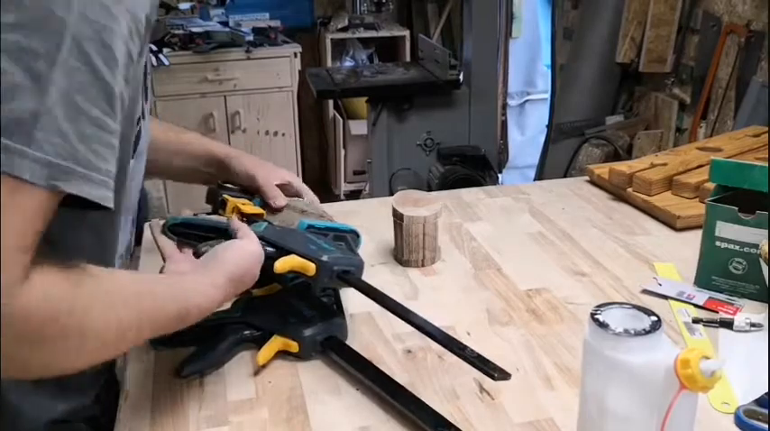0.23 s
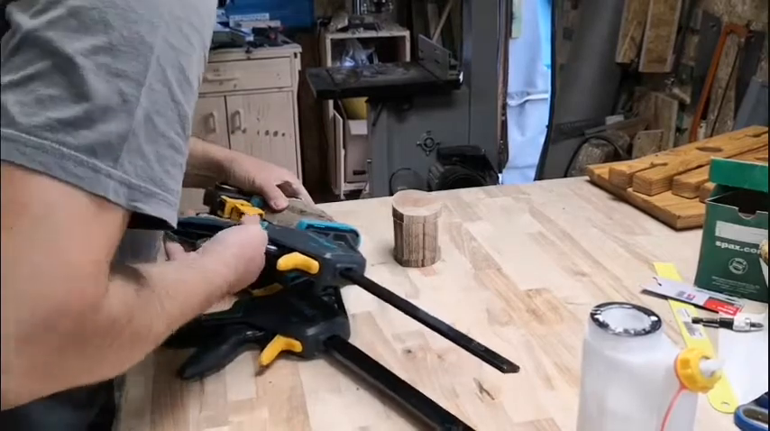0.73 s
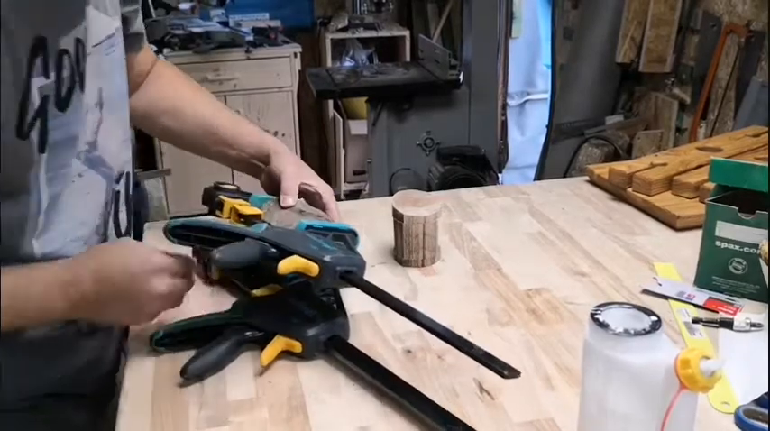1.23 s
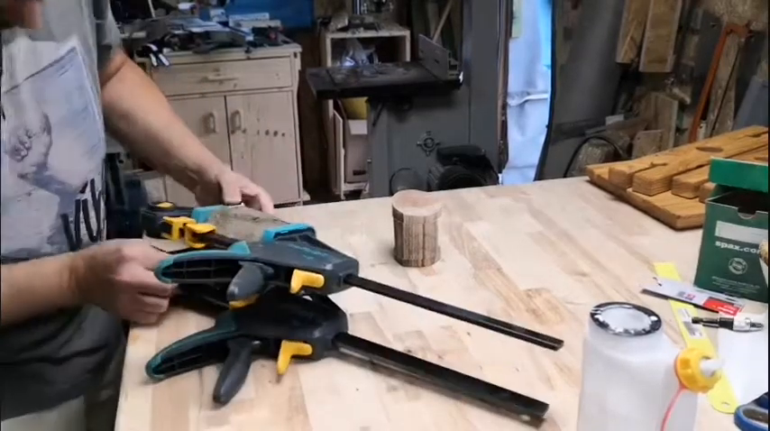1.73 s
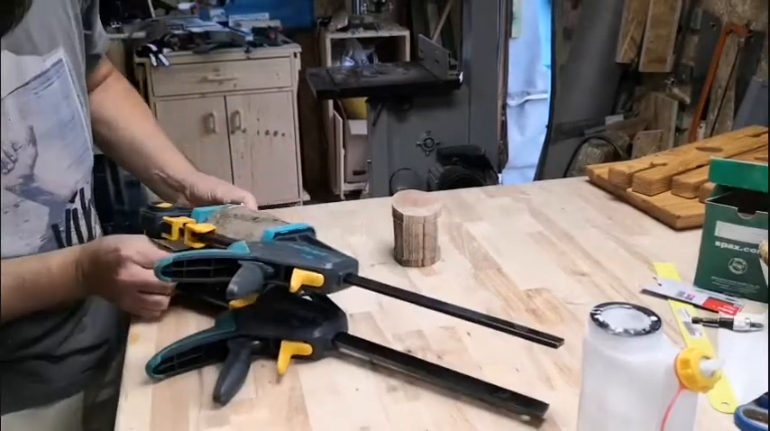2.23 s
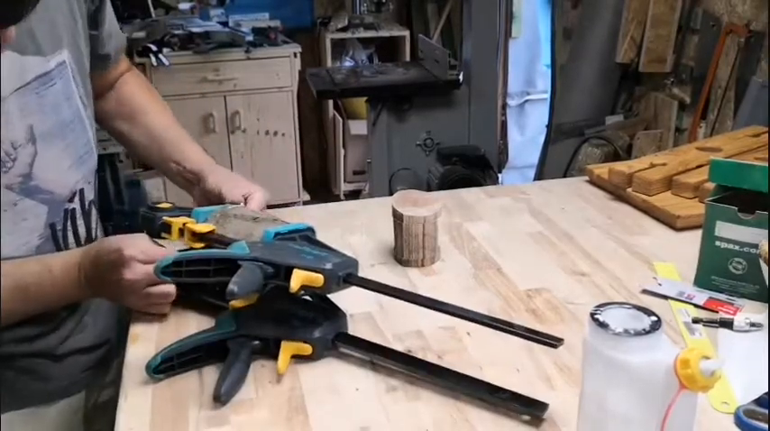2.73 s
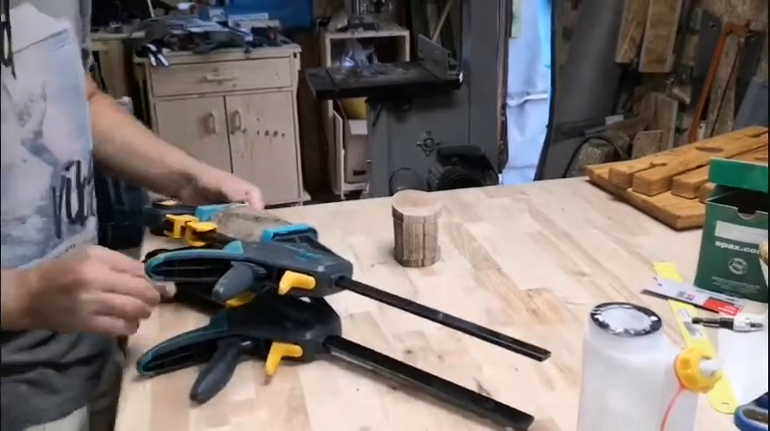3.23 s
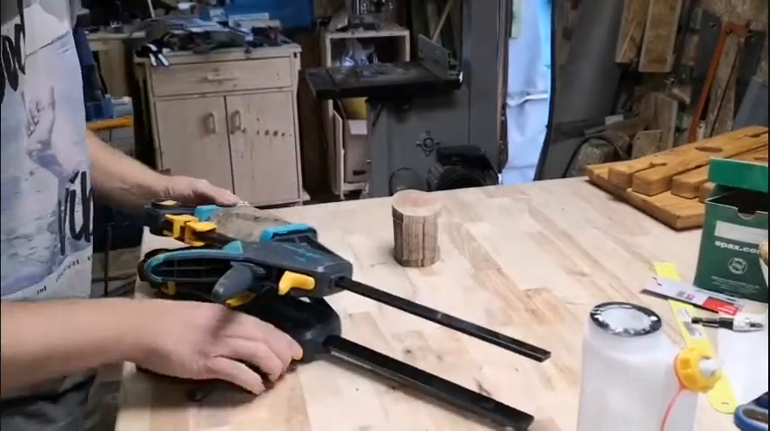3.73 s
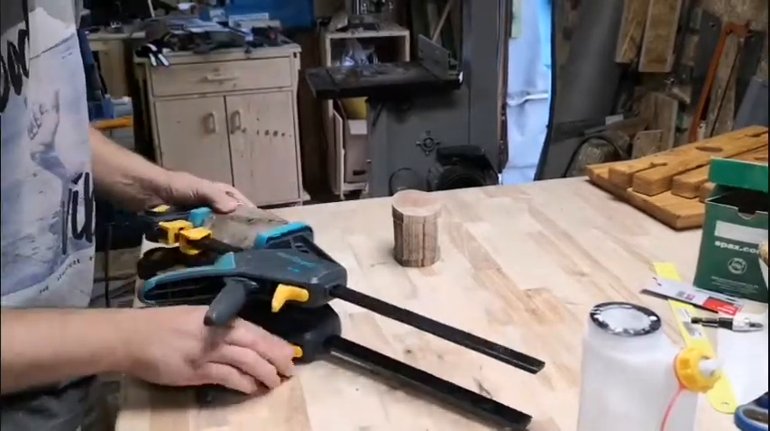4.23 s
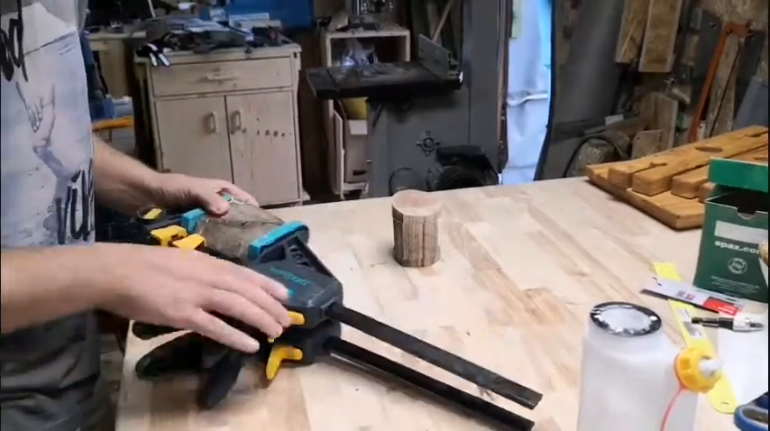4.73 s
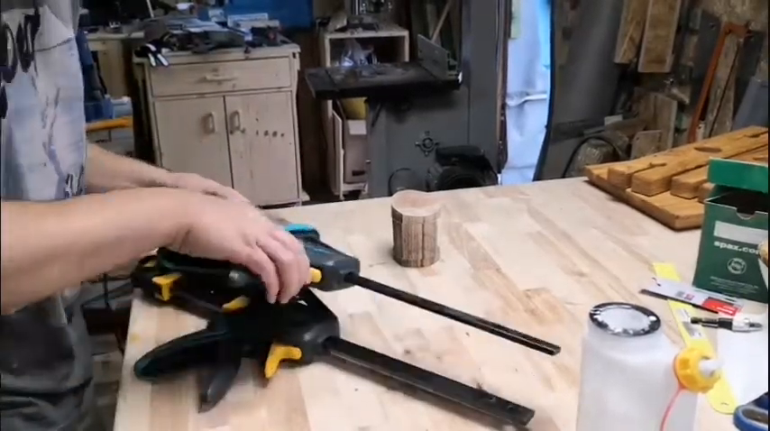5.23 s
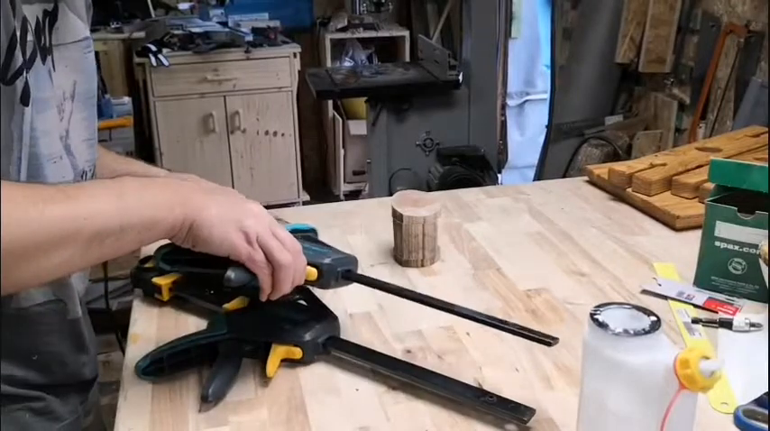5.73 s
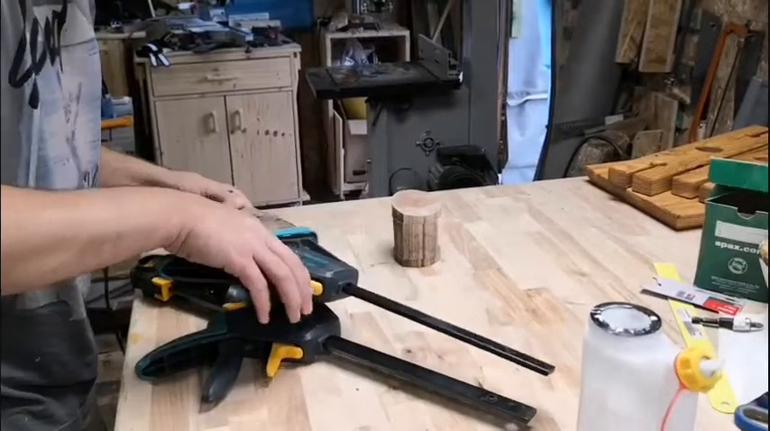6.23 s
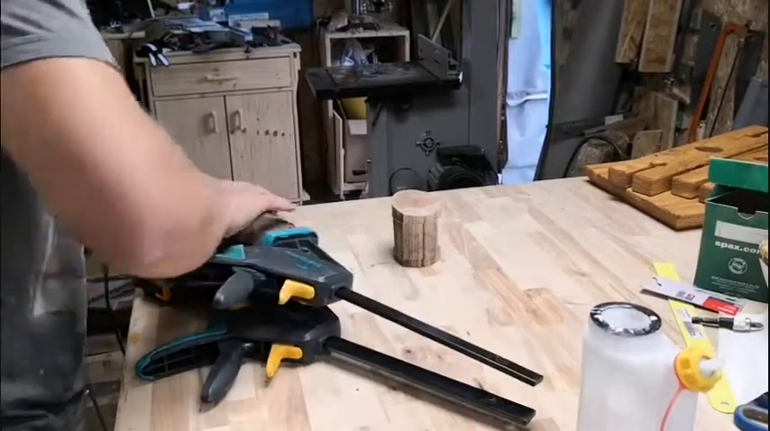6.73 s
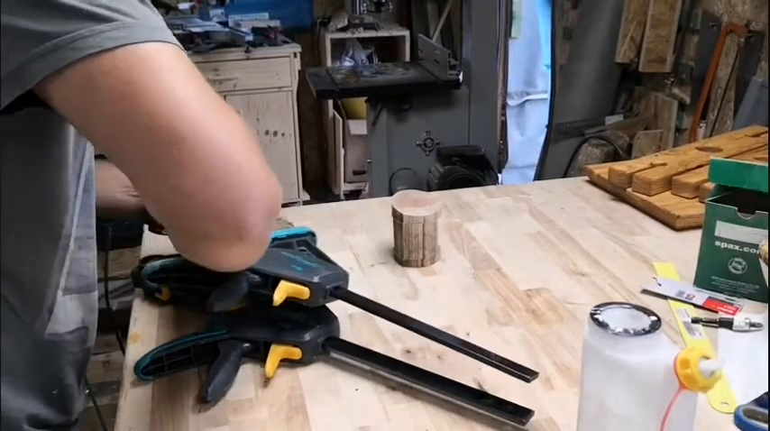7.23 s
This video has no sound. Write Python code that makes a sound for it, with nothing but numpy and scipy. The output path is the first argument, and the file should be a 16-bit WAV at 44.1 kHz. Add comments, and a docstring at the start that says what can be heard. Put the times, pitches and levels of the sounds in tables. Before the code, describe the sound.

In a small cluttered workshop, plastic and steel clamps are handled on a thick wooden bench. A cluster of clicks comes first, then scuffs and dull thumps, a flurry of knocks around three seconds, and a loud ringing snap just after four. Softer knocks, chirping squeaks and clicks follow. Close stereo microphone, short dense reflections, faint rumble and hiss.

```python
"""Plastic quick-release bar clamps click, squeak and snap as they are handled on a wooden workbench.
Clicks are shaped noise bursts that ring the handle and steel bar; squeaks are harmonic chirps, and a
trigger spring twangs in wavering partials. Knocks and pushes sound the boards and set the heavy bench
top booming, with decaying modes; slides over the wood are grainy, filtered noise.
The cluttered workshop answers with short, dense reflections, over a faint rumble and hiss."""
import sys
import numpy as np
from scipy import signal
from scipy.fft import rfft, irfft, next_fast_len
from scipy.io import wavfile
from scipy.ndimage import uniform_filter1d

SR = 44100
rng = np.random.default_rng(int(sys.argv[2]) if len(sys.argv) > 2 else 0)


def waveform_to_disk(signal):
    """Save audio, clipped to [-1, 1], as 16-bit WAV at the path in sys.argv[1]."""
    frames = np.transpose(np.atleast_2d(signal))
    scaled = np.clip(frames, -1, 1) * 32767
    samples = np.round(scaled).astype(np.int16)
    wavfile.write(sys.argv[1], SR, samples)


N = 329338

# Plastic parts click: (time [s], body [dB], middle [dB], treble [dB])
CLICK_EVENTS = [(0.002, -51, -54, -57), (0.198, -78, -60, -72), (0.611, -43, -49.5, -49),
                (0.649, -37, -45, -42.5), (0.7331, -33, -40, -34.5), (0.876, -43.5, -45.5, -43),
                (2.121, -83, -68, -75), (3.157, -51, -50, -58.5), (3.831, -67, -56.5, -72),
                (3.849, -62, -54.5, -65), (4.0953, -67, -42.5, -55.5), (4.115, -40, -27.5, -33),
                (4.1256, -34.5, -26, -40), (4.1354, -35.5, -27, -25.5), (4.4, -75.5, -68.5, -73),
                (5.008, -54, -63, -61), (5.243, -51.5, -50, -72), (5.3075, -52, -50.5, -55.5),
                (5.462, -56, -45.5, -43), (5.583, -57, -49.5, -49.5), (6.1006, -51, -49, -57),
                (6.157, -48.5, -46.5, -56.5), (6.17, -45.5, -49.5, -54.5), (7.153, -61, -64, -73)]
# Spectrum of hard plastic: (frequency [Hz], relative level [dB])
PLASTIC_COLOUR = [(120, -8), (250, 8), (370, -2.5), (530, 1), (750, -4), (1100, -9), (1800, 0.5), (2900, 1),
                  (4000, 2), (5800, -1.5), (7300, 1.5), (16000, 0)]
# Modes of the clamp with its steel bar: (frequency [Hz], relative level [dB], t60 [s])
BAR_MODES = [(567, -14, 0.24), (831, -12.5, 0.16), (1213, -17, 0.26), (1289, -14, .2), (1750, -11, .18),
             (1834, -7.5, 0.17), (1915, -4.5, 0.23), (1960, 6.5, 0.1), (2020, -1.5, .16), (2100, -5, 0.14),
             (2590, -13.5, 0.26), (3520, -17, .2), (4560, -8, 0.097), (6660, -11, 0.17), (7150, -5, .12),
             (7090, -8.5, 0.065)]
# Modes of the hollow handle: (frequency [Hz], relative level [dB], t60 [s])
HANDLE_MODES = [(262.3, -2.5, 0.12), (389.3, -9.5, 0.057), (508, -2.5, 0.078), (568.5, 2.5, 0.072),
                (686, -13.5, 0.13)]
# A trigger spring is jogged and twangs: (time [s], gain [dB])
TWANG_EVENTS = [(4.911, -62.5), (4.935, -65.5), (5.002, -61)]
# Partials of the coil spring inside a trigger: (frequency [Hz], relative level [dB], t60 [s])
SPRING_MODES = [(1559, 1.5, 0.15), (2080, 5, 0.14), (2380, -2.5, 0.13), (3120, -9, 0.24), (3960, -10, 0.2),
                (4960, -6, 0.19), (6180, -6.5, .17), (7500, -1, 0.14), (7460, -9.5, 0.12), (7430, -2, 0.15)]
# A tight grip sticks and slips: (time [s], length [s], pitch [Hz], glide [share of pitch], level [dB])
SQUEAK_EVENTS = [(5.459, 0.014, 915, 0.037, -40.5), (5.949, 0.024, 869, 0.048, -50.5),
                 (5.978, 0.031, 870, 0.036, -64), (6.003, 0.022, 984, 0.095, -46.5)]
# Strength of the squeak's harmonics: (frequency [Hz], relative level [dB])
SQUEAK_TONE = [(850, 2), (2000, 5.5), (2900, -2.5), (3900, -15), (5200, -16.5), (7000, -8.5), (8000, -13),
               (12000, -22)]
# Clamps land on, or push and jolt, the wooden bench:
# (time [s], thud [dB], hardness over the thud [dB], push on the bench [dB],
# pitch of the sway [Hz], loss of the bench's sway per rocking back [dB])
KNOCK_EVENTS = [(0.0, -55.5, -10.5, -32, 61.7, 13), (0.074, -58, -32, -30.5, 65, 7),
                (0.942, -36, -13.5, -29, 48.1, 16.5), (1.02, -57, -22, -28, 62.3, 25),
                (1.594, -37, -3, -22, 69.6, 3.5), (1.674, -49, -18, -27, 66.7, 9),
                (2.633, -48.5, -18.5, -32, 62.4, 5), (2.935, -37.5, -14.5, -25.5, 61.2, 6),
                (3.08, -32, -9, -23, 72.9, 9.5), (3.138, -45.5, -7, -28, 66.5, 17.5),
                (3.1904, -31.5, -10.5, -23, 68.9, 15), (3.231, -41.5, -20, -23, 62.8, 11),
                (4.137, -41.5, -6.5, -15, 57.7, 8.5), (3.64, -70, -5.5, -45, 78.1, 7.5),
                (4.827, -76, -24, -43, 60.5, 20), (5.01, -40.5, -14, -27, 78.4, 9),
                (5.065, -46, -10, -42.5, 70.8, 14), (5.143, -50.5, -17.5, -29.5, 63, 14),
                (5.244, -40, -21.5, -23, 71.5, 20), (5.259, -38.5, -19, -30.5, 69, 14),
                (5.286, -39, -11, -25, 72.66, 14), (5.597, -55.5, -12, -38, 61.76, 10),
                (6.179, -44.5, -8, -26, 61.8, 17), (6.226, -41.5, -15.5, -23.5, 59.4, 6),
                (6.789, -74, -11.5, -40.5, 46.7, 9), (7.105, -57, -24, -49, 78.3, 3.5)]
# Spectrum of a blow on thick wood: (frequency [Hz], relative level [dB])
WOOD_COLOUR = [(90, -12), (170, -3), (250, 2.5), (340, -8), (520, -14), (800, -20), (1700, -24.5),
               (3000, -36.5), (8000, -50)]
# The boards of the bench top: (frequency [Hz], relative level [dB], t60 [s])
BOARD_MODES = [(223, -1, 0.21), (247, -3, .16), (282.7, -2, 0.42), (352.7, -5.5, 0.19), (530, -13.5, 0.17),
               (865, -21.5, .14)]
# The whole bench booming: (frequency [Hz], relative level [dB], t60 [s])
BENCH_MODES = [(53.1, -8.5, .55), (75.07, -7, 0.39), (98.3, -16, 0.49), (134.5, -23.5, 0.34),
               (158, -38, 0.21), (217.6, -37.5, 0.14), (282.8, -36, 0.22)]
# Clamps and hands slide over the wood:
# (start [s], speeding up [s], slowing down [s], relative drag [dB], rasp [dB] and hiss [dB])
SLIDE_EVENTS = [(0.42, 0.08, 0.1, -78, -69, -70), (0.89, 0.05, 0.22, -66, -56.5, -72.5),
                (1.068, 0.1, 0.098, -74, -45, -48.5), (1.24, 0.011, 0.055, -76, -63, -53.5),
                (1.35, 0.086, 0.28, -62, -65, -71), (1.48, 0.12, 0.063, -59, -63.5, -65.5),
                (2.89, 0.047, 0.095, -68, -66, -66.5), (3.079, 0.096, 0.2, -73, -54.5, -58.5),
                (3.293, 0.037, 0.038, -76, -48.5, -45.5), (3.61, .035, 0.022, -71, -69, -65),
                (3.819, 0.028, 0.1, -57.5, -54, -65), (6.15, 0.043, .15, -65, -58, -67.5),
                (6.66, 0.11, 0.052, -84, -74, -66)]
# Spectrum of the friction noise: (frequency [Hz], relative density [dB per Hz])
FRICTION_COLOUR = [(150, -12.5), (300, -8), (550, -15.5), (850, -17), (1250, -7.5), (1600, -6.5),
                   (2000, -6.5), (2450, -4), (3050, -10.5), (6000, -10.5), (7400, -8), (8700, -29.5),
                   (15000, -25)]
# Bands of drag, rasp and hiss: (low edge [Hz], high edge [Hz])
FRICTION_BANDS = [(200, 800), (900, 2800), (2800, 16000)]
# The clamp's bar sings along as it scrapes: (frequency [Hz], width [Hz], level against the rasp [dB])
SCRAPE_MODE = (1900, 350, 1.0)
# A long bar still ringing at the start: (frequency [Hz], level [dB], t60 [s])
BAR_HUM_MODE = (436, -58.5, 1.03)
# Decay of the cluttered room: (frequency [Hz], t60 [s])
ROOM_DECAY = [(60, 0.54), (250, 0.16), (500, 0.19), (2000, 0.23), (7000, 0.22), (15000, 0.084)]
# Left-right likeness of diffuse sound: (frequency [Hz], correlation [-1 to 1])
STEREO_LIKENESS = [(100, 0.97), (260, 0.25), (400, 0.057), (1200, 0.22), (2000, 0.028), (6000, 0.058),
                   (9000, 1), (15000, 1)]
# Phase by which the left channel leads: (frequency [Hz], phase [rad])
STEREO_PHASE = [(60, 0.44), (170, 0.18), (330, 1.0), (650, 1.53), (1300, -0.06), (2500, 4), (4000, 1.5),
                (6000, 1.6), (7300, 0.57), (15000, -6.5)]
# Left level over right level: (frequency [Hz], difference [dB])
STEREO_BALANCE = [(250, 0), (600, 1), (1100, 1), (4500, 0), (8000, 0), (13000, -1.5)]
# Dull treble of clicks, knocks, twangs and squeaks: (frequency [Hz], gain [dB])
HIT_DULLNESS = [(20, -5.5), (7600, -1), (8450, -21.5), (9600, -37), (11000, -18.5), (15500, -25.5)]
# Spectrum of the workshop's rumble and hiss: (frequency [Hz], relative density [dB per Hz])
BACKGROUND_COLOUR = [(12, -26.5), (20, 2), (91, -2.5), (127, -21), (158, -11.5), (187, -22), (222, -21.5),
                     (377, -26.5), (434, -30.5), (499, -30), (780, -33), (949, -27.5), (1120, -31),
                     (1660, -26), (16000, -49)]
# Edges between body, middle and treble of a click, and between thud, knock and clack: (frequency [Hz])
CLICK_EDGES = [200, 700, 2500, 8500]
KNOCK_EDGES = [170, 420, 950, 2800]

HIT_SIZE = 32768  # samples in one hit with its ring and room
T = np.arange(HIT_SIZE) / SR
HZ = np.fft.rfftfreq(HIT_SIZE, 1 / SR)
BACKGROUND_DB, TOP_EDGE_HZ = -61, 15800
BAR_LOOSE_DB, BAR_GROWTH = -31, 1.7  # treble that jars the bar loose; extra dB of ring per dB beyond it
CLICK_PUSH_DB, CLICK_SWAY_HZ = 2.5, 73  # a click also pushes the bench: dB over its body, pitch of the sway
CLACK_DB = -10  # the clack of a hard contact, against the knock
HEAVE_LAG_S = 0.00909  # the heavy top gives way a little after the blow or push
ROCK_S, ROCK_SHRINK = 0.049, 0.903  # wait before the first rocking back; factor on each later wait
STROKE_POWER = 1.4  # friction noise grows with this power of the speed


def clicks(bar_db=-10.5, handle_db=-9.0, spread_db=9.5):
    """Hard plastic snaps; each has its own weight and brightness, and shakes handle and steel bar."""
    snaps, ringing = np.zeros((2, N)), np.zeros(N)
    handle = ring(HANDLE_MODES)
    bar_modes = np.array([ring([mode]) for mode in BAR_MODES])
    for s, body_db, middle_db, treble_db in CLICK_EVENTS:
        colour_db = voiced(PLASTIC_COLOUR, CLICK_EDGES, [body_db, middle_db, treble_db])
        add(snaps, s, contact(colour_db, sharp=0.48, chatter_s=0.0055, wet_db=1.5))
        # the spot that is struck decides how strongly, and which way, each mode of the bar swings
        strength = amp(spread_db * rng.uniform(-0.35, 1, len(BAR_MODES)))
        swing = rng.choice([-1, 1], len(BAR_MODES)) * strength
        ring_db = treble_db + bar_db + BAR_GROWTH * max(treble_db - BAR_LOOSE_DB, 0)
        bar = amp(ring_db) * (swing @ bar_modes)
        add(ringing, s, bar + amp(body_db + handle_db) * handle)
    return snaps + room(ringing, wet_db=-9.5)


def squeaks(jitter=0.037):
    """Quick, slightly uneven slips make a short harmonic chirp."""
    out = np.zeros(N)
    for s, length_s, hz, glide, db in SQUEAK_EVENTS:
        progress = np.linspace(0, 1, int(length_s * SR))
        waver = evened(uniform_filter1d(rng.standard_normal(len(progress)), size=60))
        pitch_hz = hz * (1 + glide * (progress - 0.5) + jitter * waver)
        turns = np.cumsum(pitch_hz) / SR
        slips = np.zeros(len(progress))
        for k in range(1, 13):
            slips += amp(read(SQUEAK_TONE, k * hz)) * np.cos(2 * np.pi * k * turns)
        add(out, s, amp(db) * evened(slips) * signal.windows.tukey(len(progress), 0.6))
    return out


def twangs(swell_s=0.0023, waver=0.017, buzz_db=-4.0, buzz_s=0.03):
    """A jogged coil spring rings with unrelated partials, wavering and buzzing against its seat."""
    out, partials = np.zeros(N), ring(SPRING_MODES)
    for s, db in TWANG_EVENTS:
        bend = evened(uniform_filter1d(rng.standard_normal(HIT_SIZE), size=150))
        bent_time = T + waver * np.cumsum(bend) / SR
        spring = np.interp(bent_time, T, partials)
        buzz = amp(buzz_db) * rng.standard_normal(HIT_SIZE) * np.exp(-T / buzz_s)
        swell = 1 - np.exp(-T / swell_s)
        add(out, s, amp(db) * (spring + buzz) * swell)
    return out


def knocks(boards_db=-6.0, softer_db=5.0):
    """Dull blows and pushes on thick wood, with more clack the harder the contact; the boards ring."""
    out, boards = np.zeros((2, N)), ring(BOARD_MODES)
    for s, thud_db, hardness_db, _, _, loss_db in KNOCK_EVENTS:
        knock_db = thud_db + hardness_db
        colour_db = voiced(WOOD_COLOUR, KNOCK_EDGES, [thud_db, knock_db, knock_db + CLACK_DB])
        blow = contact(colour_db, sharp=0.3, chatter_s=0.011, wet_db=1.5)
        blow = blow + amp(thud_db + boards_db) * boards
        # the sound of the blow loses more per rocking than the bench's sway
        for at, gain in rocking(s, loss_db + softer_db):
            add(out, at, gain * blow)
    return out


def thumps(swell_s=0.014, peak_db=1.5):
    """Clicks, knocks, pushes and rockings heave the bench top for a few cycles; its modes ring on."""
    pushes = [(s, amp(body_db + CLICK_PUSH_DB), CLICK_SWAY_HZ) for s, body_db, *_ in CLICK_EVENTS]
    for s, _, _, push_db, hz, loss_db in KNOCK_EVENTS:
        pushes += [(at, gain * amp(push_db), hz) for at, gain in rocking(s, loss_db)]
    out = np.zeros(N)
    boom = ring(BENCH_MODES) * (1 - np.exp(-T / swell_s))
    heave = (T / swell_s) ** 2 * np.exp(2 - 2 * T / swell_s)  # peaks at 1 after swell_s
    for s, gain, hz in pushes:
        sway = heave * np.sin(2 * np.pi * hz * T)
        add(out, s + HEAVE_LAG_S, gain * amp(peak_db) * (sway + boom))
    return out


def rocking(s, loss_db, count=3):
    """Times and gains of a knock or push and of the ever quicker, weaker rocking after it."""
    for k in range(count):
        yield s, amp(-k * loss_db)
        s += ROCK_S * ROCK_SHRINK ** k


def slides(grain_db=4.5, grains_per_s=900, drag_db=-4.5, rasp_db=-4.5, hiss_db=-6.5):
    """Countless tiny catches on the wood grain: a low drag, a rasp near 2 kHz and a finer hiss."""
    caught = rng.random(N) < grains_per_s / SR
    size = amp(grain_db * np.minimum(rng.exponential(1, N), 4)) * caught
    # a weak steady noise fills the gaps between the catches
    catches = tint((size + 0.053) * rng.standard_normal(N), FRICTION_COLOUR)
    bands = []
    for band in FRICTION_BANDS:
        sos = signal.butter(3, band, "band", fs=SR, output="sos")
        bands.append(evened(signal.sosfilt(sos, catches)))
    drag, rasp, hiss = bands
    hz, width_hz, db = SCRAPE_MODE
    singing = evened(signal.lfilter(*signal.iirpeak(hz, hz / width_hz, fs=SR), rasp))
    rasp = evened(rasp + amp(db) * singing)
    return amp([drag_db, rasp_db, hiss_db]) @ (np.array([drag, rasp, hiss]) * pressure())


def pressure():
    """Gains of drag, rasp and hiss over time: each slide speeds up smoothly and comes to rest."""
    out, t = np.zeros((len(FRICTION_BANDS), N)), np.arange(N) / SR
    for s, rise_s, fall_s, *levels_db in SLIDE_EVENTS:
        length_s = rise_s + fall_s
        progress = np.interp(t[t < length_s], [0, rise_s, length_s], [0, 0.5, 1])
        speed = np.sin(np.pi * progress)
        add(out, s, amp(levels_db)[:, None] * speed ** STROKE_POWER)
    return out


def bar_hum():
    """A long bar is still ringing at the start, one mode dying away."""
    out = np.zeros(N)
    add(out, 0, ring([BAR_HUM_MODE]))
    return out


def room(x, wet_db):
    """Direct sound plus reflections off the bench and the cluttered walls."""
    return x + amp(wet_db) * signal.fftconvolve(x[None], reflections(), axes=1)[:, :N]


def reflections():
    """The room's dense stereo answer, scaled to left energy 1, each frequency dying at its own speed."""
    hz, t, z = signal.stft(diffuse(HIT_SIZE), SR, nperseg=256)
    decay = np.exp(-np.log(1000) * t / read(ROOM_DECAY, hz)[:, None])
    tail = signal.istft(z * decay, SR, nperseg=256)[1][:, :HIT_SIZE]
    tail = tail * (1 - np.exp(-T / 0.00042))  # soft onset
    return tail / np.linalg.norm(tail[0])


def stereo(x):
    """Sets left and right apart in phase and level, half of each difference to either side."""
    size = next_fast_len(N + HIT_SIZE)
    hz = np.fft.rfftfreq(size, 1 / SR)
    half = np.sqrt(amp(read(STEREO_BALANCE, hz))) * np.exp(0.5j * read(STEREO_PHASE, hz))
    return irfft(rfft(x, size) * np.array([half, 1 / half]), size)[:, :N]


def background():
    """The faint rumble and hiss of the workshop, as steady coloured noise."""
    noise = tint(diffuse(next_fast_len(N, True)), BACKGROUND_COLOUR)[:, :N]
    return amp(BACKGROUND_DB) * evened(noise)


def contact(colour_db, sharp, chatter_s, wet_db):
    """A sharp blow, a brief chatter of the touching faces, and the room as heard from that spot."""
    grains = rng.standard_normal(HIT_SIZE) * np.exp(-T / chatter_s)
    blow = sharp * signal.unit_impulse(HIT_SIZE) + grains / np.linalg.norm(grains)
    heard = blow / np.linalg.norm(blow) + amp(wet_db) * reflections()
    return irfft(rfft(heard) * rfft(pulse(colour_db)))


def voiced(material, edges_hz, levels_db):
    """A material's spectrum, tilted towards these levels, over 10 ms, between the edges."""
    db, points = read(material, HZ), []
    for low, high, level_db in zip(edges_hz, edges_hz[1:], levels_db):
        inside = (HZ > low) & (HZ < high)
        energy = 2 * np.sum(amp(db[inside]) ** 2) / HIT_SIZE
        lift_db = level_db - 10 * np.log10(energy / (SR / 100))
        points += [(low * 1.15, lift_db), (high / 1.15, lift_db)]  # glide between bands
    return db + read(points, HZ)


def pulse(db):
    """The sharpest causal pulse with this spectrum (minimum phase, by folding the cepstrum)."""
    cepstrum = irfft(np.log(amp(np.maximum(db, -100))))
    cepstrum[1:HIT_SIZE // 2] *= 2
    cepstrum[HIT_SIZE // 2 + 1:] = 0
    return irfft(np.exp(rfft(cepstrum)))


def ring(modes):
    """Struck modes, each a sine dying at its own speed."""
    out = np.zeros(HIT_SIZE)
    for hz, db, t60 in modes:
        out += amp(db) * np.exp(-np.log(1000) * T / t60) * np.sin(2 * np.pi * hz * T)
    return out


def diffuse(size):
    """Stereo noise whose left and right are as alike as the likeness table says."""
    left, other = rfft(rng.standard_normal((2, size)))
    same = np.clip(read(STEREO_LIKENESS, np.fft.rfftfreq(size, 1 / SR)), -1, 1)
    right = same * left + np.sqrt(1 - same ** 2) * other
    return irfft(np.array([left, right]), size)


def tint(x, points):
    """Colours a steady sound by a table of dB."""
    gain = amp(read(points, np.fft.rfftfreq(x.shape[-1], 1 / SR)))
    return irfft(rfft(x) * gain, x.shape[-1])


def read(points, hz):
    """Reads a table on a log-frequency axis."""
    f, value = np.transpose(points)
    return np.interp(np.log(hz + 1), np.log(f + 1), value)


def amp(db):
    """Decibels to gain."""
    return 10 ** (np.asarray(db) / 20)


def evened(x):
    """Scales to rms 1."""
    return x / np.sqrt(np.mean(x ** 2) + 1e-20)


def add(mix, s, sound):
    """Mixes a sound in at time s."""
    part = mix[..., max(round(s * SR), 0):][..., :sound.shape[-1]]
    part += sound[..., :part.shape[-1]]


def scene():
    """Clamps and bench in the room, over a faint rumble and hiss."""
    hits = clicks() + knocks() + room(twangs(), wet_db=4.0) + room(squeaks(), wet_db=0.0)
    hits = signal.oaconvolve(hits, pulse(read(HIT_DULLNESS, HZ))[None], axes=1)[:, :N]
    near = hits + room(slides(), wet_db=0.5) + thumps() + bar_hum()
    return stereo(near) + background()


def record(dry):
    """Cuts everything above the top edge with a steep linear-phase low-pass."""
    lowpass = signal.firwin(511, TOP_EDGE_HZ, window=("kaiser", 9), fs=SR)
    return signal.oaconvolve(dry, lowpass[None], "same")


dry = scene()
out = record(dry)
waveform_to_disk(out)
```